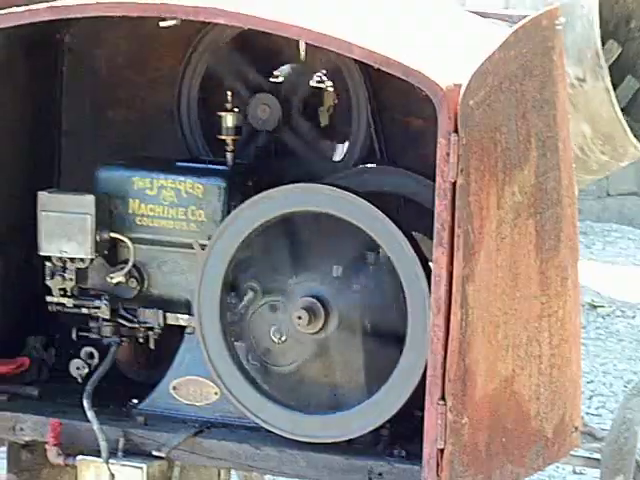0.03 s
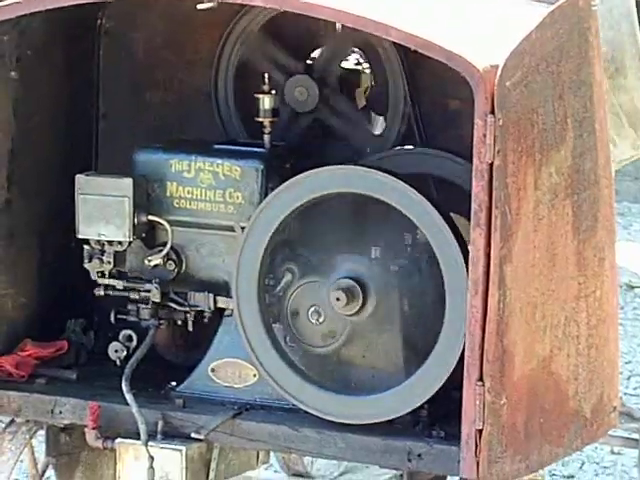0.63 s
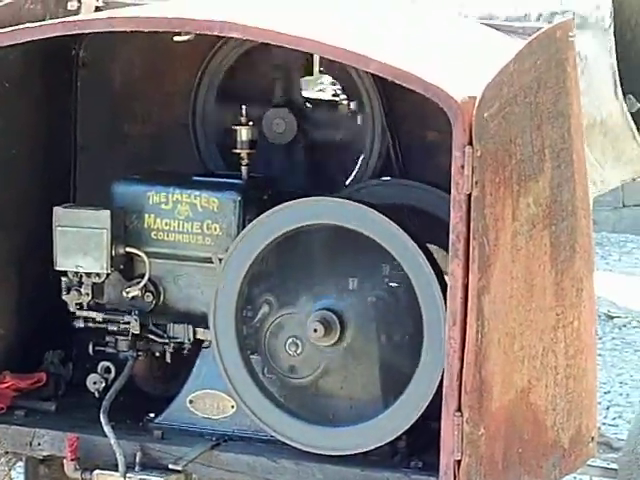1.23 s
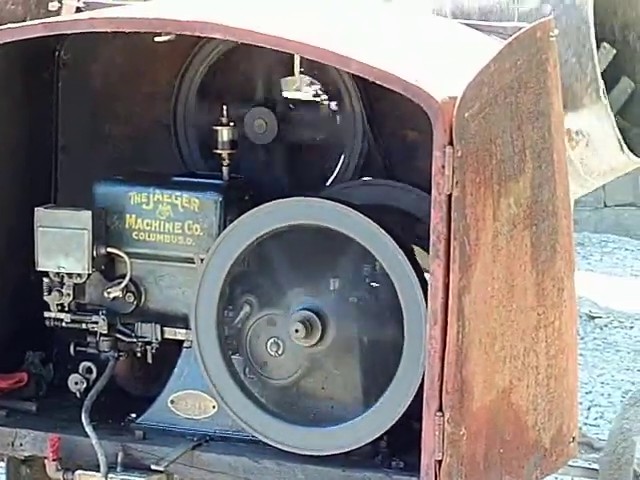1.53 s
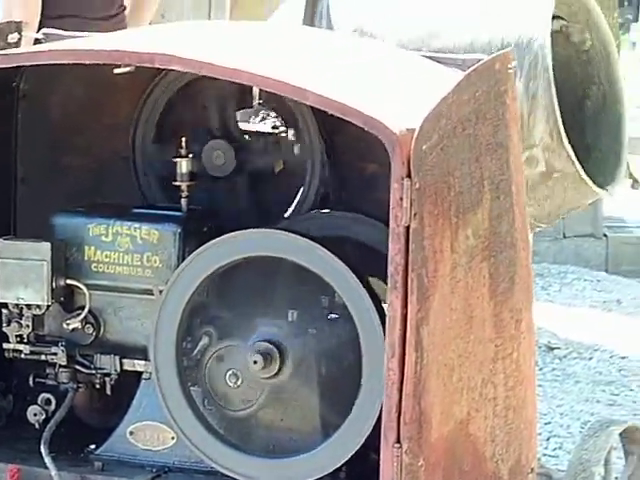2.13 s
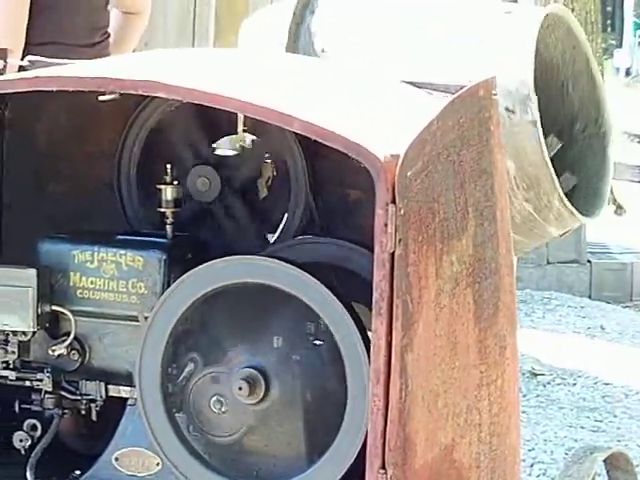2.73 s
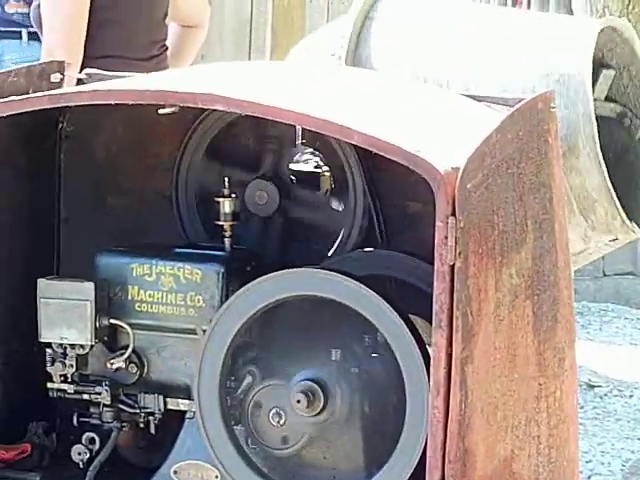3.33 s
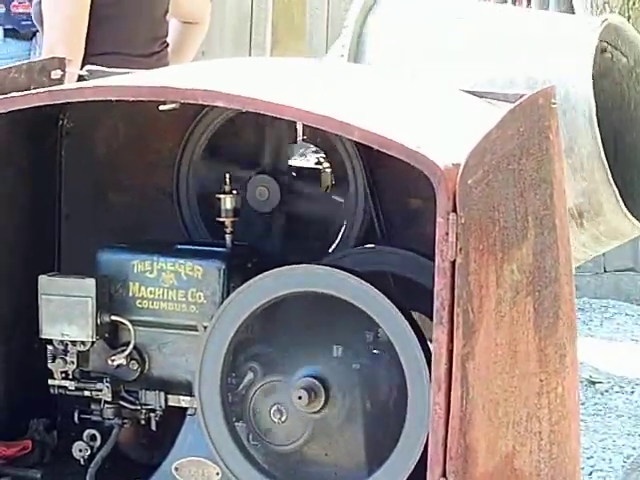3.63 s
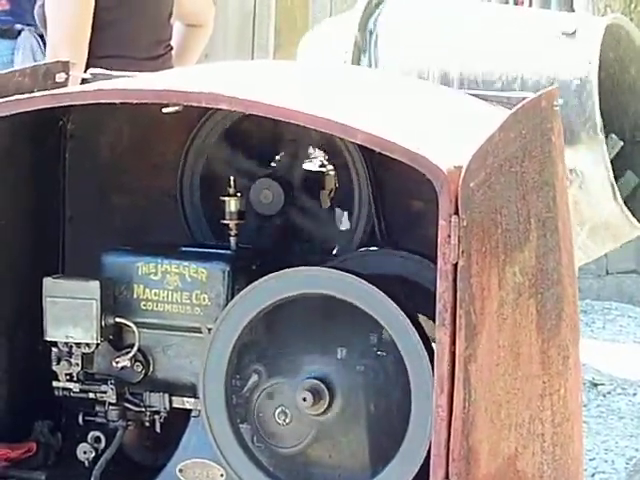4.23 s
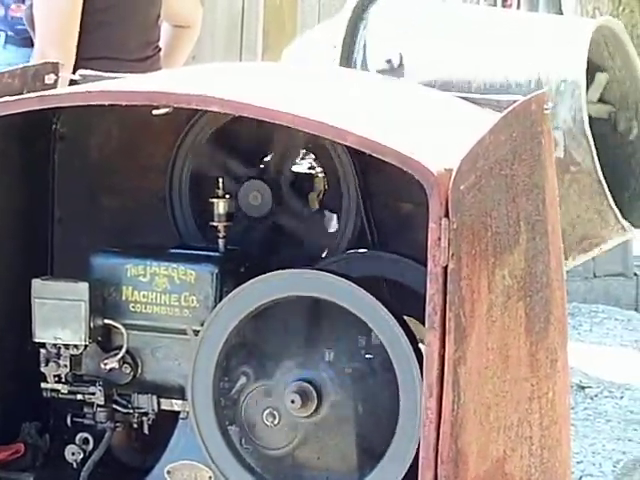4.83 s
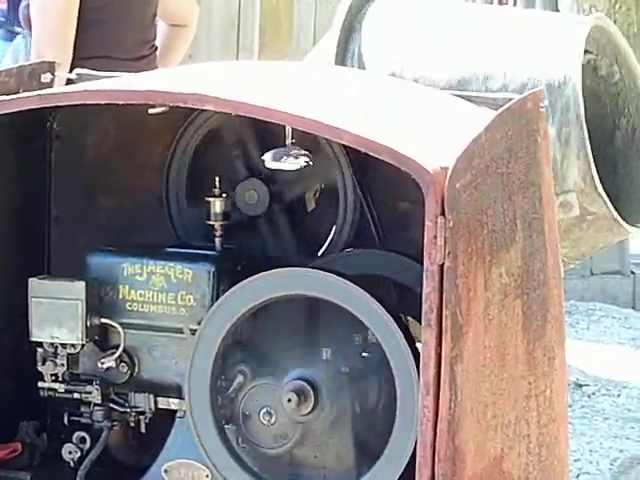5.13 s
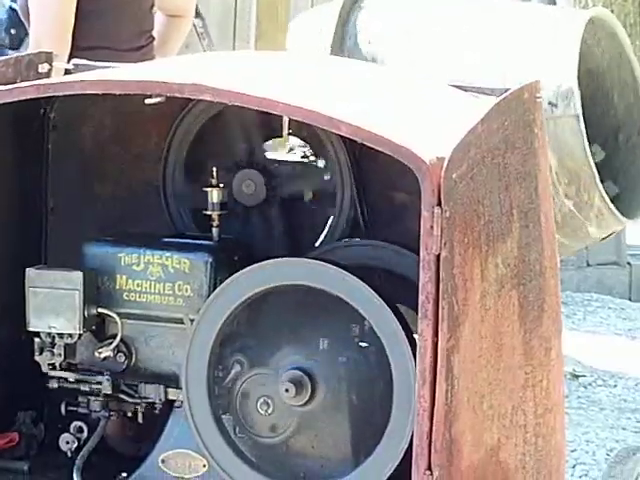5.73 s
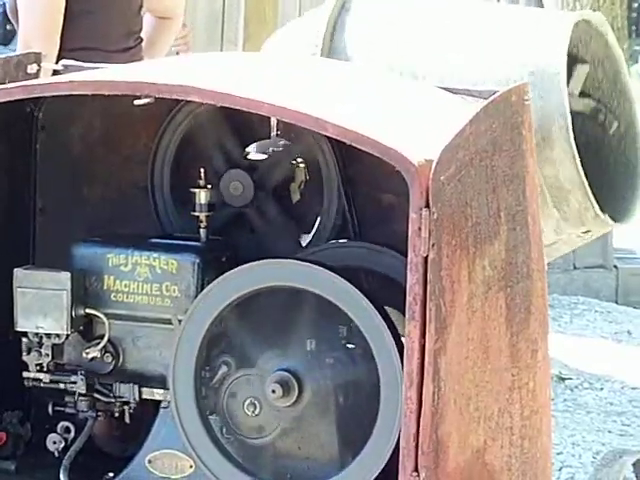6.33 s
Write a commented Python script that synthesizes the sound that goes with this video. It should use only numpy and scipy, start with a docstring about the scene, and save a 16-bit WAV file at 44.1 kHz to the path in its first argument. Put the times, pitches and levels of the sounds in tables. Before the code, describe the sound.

An old stationary engine runs outdoors inside the sheet-steel housing of a cement mixer. It fires six quickening pops, each with a hissing spit and a hollow clonk, then coasts for about four seconds before firing five more times. Throughout, gear teeth rattle in rhythmic surges, loose iron ticks and knocks, and the panels drone over a low rumble. A small mono microphone slightly rounds off the pops.

```python
"""A hit-and-miss engine pops inside the sheet-steel housing of a cement mixer, outdoors.
It fires six times, coasts for four seconds on its flywheels, then fires five times more.
Each pop is a push of gas that rings the exhaust pipe, with a hissing spit and a hollow clonk.
All along, gear teeth rattle, loose iron ticks and knocks, and the machine turning the drum
makes its panels drone and its frame rumble."""
import sys
import numpy as np
from scipy import signal
from scipy.io import wavfile

SR = 44100
rng = np.random.default_rng(int(sys.argv[2]) if len(sys.argv) > 2 else 0)


def master(y):
    """Save y as 16-bit WAV."""
    cut = np.clip(np.atleast_2d(y).T, -1, 1)
    pcm = np.round(cut * 32767)  # scale
    wavfile.write(sys.argv[1], SR, pcm.astype(np.int16))


N = 280917
TIME = np.arange(N) / SR
LIGHT_LOAD_DB = -33  # the gear level in LOAD that counts as easy running

# each firing: (time [s], gas push [dB], exhaust spit [dB], housing clonk [dB], extra grinding [dB])
FIRINGS = [(0.3089, -16.5, -17.5, -33, 8), (0.541, -18, -17.5, -29.5, 5), (0.7614, -20, -16.5, -33, 7.5),
           (0.9742, -19, -17.5, -29, 9), (1.1762, -20.5, -19, -28.5, 6.5), (1.371, -19, -17.5, -36.5, 5),
           (5.4562, -15.5, -16, -30, 6), (5.6827, -18.5, -18, -29.5, 5), (5.8958, -19.5, -17, -31, 7),
           (6.1012, -19.5, -17, -28, 5.5), (6.2814, -19, -17, -45, 7.5)]
# base levels, higher as the drum comes round: (time [s], gears [dB], housing drone [dB], rumble [dB])
LOAD = [(.2, -29.5, -40.5, -34), (.65, -31, -44, -38.5), (1.3, -30, -41.5, -38), (1.53, -35, -40, -38.5),
        (2.1, -30.5, -40, -36), (2.52, -27, -35, -33.5), (2.88, -33.5, -40.5, -39), (3.62, -34.5, -41, -38),
        (3.78, -29.5, -37.5, -35), (4.42, -25.5, -36, -31.5), (4.6, -27.5, -40, -36),
        (4.8, -29.5, -37, -35), (5.1, -25, -35, -31), (5.43, -26, -38.5, -31.5), (5.54, -32, -42, -40),
        (5.82, -33, -42, -37.5), (6.37, -30, -39.5, -37)]
# the broad tone of iron hitting iron: (frequency [Hz], level [dB])
IRON_TONE = [(300, -44), (900, -15), (1400, -14.5), (2500, -14.5), (3200, -8.5), (4500, -6.5), (5900, -8.5),
             (6550, -3), (7600, -1.5), (8300, -12)]
# the pitches at which the gears ring: (pitch [Hz], width [Hz], boost [dB])
GEAR_RINGS = [(2212, 30, 7.5), (2421, 62, 7.5), (2644, 37, 6.5), (5167, 54, 8.5), (6660, 140, 6),
              (8200, 120, 1)]


def amp(db):
    """Turns decibels into a factor to multiply by."""
    return 10 ** (np.asarray(db) / 20)


def evened(x):
    """Scales a signal to an average (rms) level of 1."""
    return x / np.sqrt(np.mean(x ** 2) + 1e-20)


def add(mix, s, sound):
    """Mixes a sound in, starting at s seconds."""
    part = mix[round(s * SR):][:len(sound)]
    part += sound[:len(part)]


def colour(x, tone, rings=(), size=8192):
    """Filters x to a broad tone (Hz, dB) with narrow ringing peaks (Hz, width in Hz, dB) on top."""
    hz = abs(np.fft.fftfreq(size, 1 / SR))
    points_hz, points_db = np.transpose(tone)
    db = np.interp(np.log(hz + 1), np.log(points_hz), points_db)
    for centre, width, boost in rings:
        db = db + boost / (1 + (2 * (hz - centre) / width) ** 2)
    spectrum = np.exp(np.conj(signal.hilbert(np.log(amp(db)))))  # rings after a blow, never before
    response = np.fft.ifft(spectrum).real
    return signal.oaconvolve(x, response[:size // 2])[:len(x)]


def noise(tone, rings=(), length=N):
    """Steady noise with the given tone, at level 1."""
    return evened(colour(rng.standard_normal(length), tone, rings))


def impacts(per_s, spread_db):
    """A random stream of tiny blows, a few harder than the rest."""
    strength = amp(spread_db * np.minimum(rng.exponential(1, N), 4))
    return evened(strength * rng.choice([-1, 1], N) * (rng.random(N) < per_s / SR))


def flutter(hz):
    """A smooth random wobble, mostly slower than hz."""
    return evened(signal.sosfilt(signal.butter(2, hz, fs=SR, output="sos"), rng.standard_normal(N)))


def fading_note(t, hz, db, fade_s):
    """One ring, slightly off pitch each time. A fade time is how long a sound takes to drop 60 dB."""
    return amp(db - 60 * t / fade_s) * np.sin(2 * np.pi * hz * (1 + 0.014 * rng.standard_normal()) * t)


def wall_echoes(x, fade_s, echo_db):
    """Adds the short, dense echoes between the steel walls."""
    t = TIME[:SR // 5]
    tail = rng.standard_normal(len(t)) * amp(-60 * t / fade_s) * (t > .001)
    return x + amp(echo_db) * signal.oaconvolve(x, tail / np.linalg.norm(tail))[:N]


def crank(firing_turns=2, coast_turns=38, drag_turns_per_s2=0.59):
    """Turns of the crank since the first firing, and when it coasts, slowed evenly by friction."""
    fired = np.array([row[0] for row in FIRINGS])
    gaps = np.diff(fired)
    coast = np.argmax(gaps)
    counts = np.cumsum(np.r_[0, np.where(gaps == gaps[coast], coast_turns, firing_turns)])
    times = np.r_[fired[0] - gaps[0], fired, fired[-1] + gaps[-1]]
    turns = np.interp(TIME, times, np.r_[-firing_turns, counts, counts[-1] + firing_turns])
    slowing = np.maximum((TIME - fired[coast]) * (fired[coast + 1] - TIME), 0)
    return turns + .5 * drag_turns_per_s2 * slowing, slowing > 0


def hump(turns, at_turn, width_turns):
    """A smooth bump of height 1 that comes round once a turn."""
    distance = (turns - at_turn + .5) % 1 - .5
    return np.exp(-.5 * (distance / width_turns) ** 2)


def piston_shakes(at_turn=.33, width_turns=.11, rise_db=4, between_db=-0.66):
    """Change of the drone in dB: the coasting piston shakes the housing at each end of its stroke."""
    turns, coasting = crank()
    ends = hump(turns, at_turn, width_turns) + hump(turns, at_turn + .5, width_turns)
    return coasting * (between_db + rise_db * ends)


def housing(drone_db=-4.5, rumble_db=-4, wobble_db=1.7):
    """The running machine shakes the panels of its housing and rocks the frame."""
    # broad tones of the panels and of the frame: (frequency [Hz], level [dB])
    panel_tone = [(120, -23), (260, -3.5), (400, 1), (500, -2), (700, 2.5), (850, 1.5), (1050, -4.5),
                  (1800, -25.5), (4000, -68)]
    frame_tone = [(8, -31.5), (25, 0.5), (50, -4), (80, -5), (115, -2.5), (170, -6), (240, -10), (400, -20),
                  (1500, -59)]
    # where the panels ring: (pitch [Hz], width [Hz], boost [dB])
    panel_rings = [(300, 7.7, 4.9), (356.6, 15, 9.2), (616.3, 31, 7.2), (694, 36, 2.9), (756, 43, 3.5),
                   (797, 34, 4.6)]
    # the housing's deepest boom: (time [s], level [dB])
    boom_levels = [(.2, -47.5), (2.2, -51), (3.05, -44.5), (3.4, -35), (3.6, -51), (4.0, -48), (4.6, -40.5),
                   (5.5, -40.5), (6.37, -52)]
    s, _, panel_db, frame_db = np.transpose(LOAD)
    drone = evened(colour(impacts(per_s=900, spread_db=1.0), panel_tone, panel_rings))
    drone *= amp(np.interp(TIME, s, panel_db) + piston_shakes() + drone_db + wobble_db * flutter(25))
    rumble = evened(colour(impacts(per_s=300, spread_db=2.5), frame_tone))
    rumble *= amp(np.interp(TIME, s, frame_db) + rumble_db)
    boom = noise([(15, -28), (40, -6), (53, 2), (66, -11.5), (130, -36.5), (1000, -82.5)])
    boom *= amp(np.interp(TIME, *np.transpose(boom_levels)))
    return drone + rumble + boom


def knocks(rise_s=0.0034):
    """Loose metal knocks: a short ring inside a burst of clatter around the same pitch."""
    # loose parts: (time [s], pitch [Hz], level [dB], fade [s], share of noise [0-1])
    blows = [(2.476, 2230, -24.5, 0.061, 0.8), (2.654, 1560, -21.5, 0.042, 0.5),
             (3.745, 334, -33.5, 0.16, 0.97), (3.797, 616, -26.5, 0.076, 0.94),
             (3.822, 140, -25, .05, 0.94), (4.022, 674, -28.5, 0.041, 0.87),
             (4.248, 632, -30.5, 0.076, 0.2), (4.399, 242, -24, 0.03, 0.64), (4.429, 95, -24.5, .09, 0.4),
             (4.456, 1652, -21.5, 0.046, 0.63), (4.585, 712, -28, 0.055, .4), (5.125, 367, -25.5, 0.065, 1),
             (5.272, 305, -22, 0.087, 0.25), (5.287, 73.5, -22, 0.074, 0.75)]
    latch_clinks = [(s, 2260, -30, .01, .5) for s, *_ in FIRINGS]
    t, out = TIME[:SR // 5], np.zeros(N)
    for s, hz, db, fade_s, noisy in blows + latch_clinks:
        clatter = noise([(hz / 2, -7), (hz, 0), (hz * 2, -14), (hz * 10, -60)], length=len(t))
        ring = np.sin(2 * np.pi * hz * t)
        body = np.sqrt(noisy) * clatter + np.sqrt(2 * (1 - noisy)) * ring
        add(out, s, amp(db - 60 * t / fade_s) * np.minimum(t / rise_s, 1) * body)
    return wall_echoes(out, fade_s=0.28, echo_db=-3.5)


def ticks(rise_s=0.00043, igniter_lead_s=0.012):
    """An opening click, then quick buzzes of iron on iron; the igniter trips just before each firing."""
    # a short click as the sound starts, then the loudest ticks of the linkage:
    # (time [s], level [dB], fade [s])
    clicks = [(.197, -28, 0.018), (0.248, -13.5, 0.011), (.273, -22, 0.017), (0.426, -22.5, 0.037),
              (1.776, -23, 0.031), (1.977, -18.5, 0.028), (2.163, -22, .04), (3.828, -17, .035),
              (3.9012, -20, 0.028), (4.2945, -20.5, 0.028), (4.4126, -18.5, 0.062), (4.457, -20, 0.088),
              (4.765, -19.5, .025), (5.441, -23, 0.049)]
    igniter = [(s - igniter_lead_s, -30, .045) for s, *_ in FIRINGS]
    t, level = TIME[:SR // 10], np.zeros(N)
    for s, db, fade_s in clicks + igniter:
        add(level, s, amp(db - 60 * t / fade_s) * np.minimum(t / rise_s, 1))
    return level * noise(IRON_TONE, GEAR_RINGS)


def cam_scrape(at_turn=0.29, width_turns=0.093):
    """Swells from 0 to 1 on every second coasting turn, as the cam scrapes past its follower."""
    turns, coasting = crank()
    return coasting * hump(turns / 2, at_turn / 2, width_turns / 2)


def gear_surges(load_db, at_turn=0.21, width_turns=.16, height=7):
    """Change of the gear clatter in dB: it swells twice a turn, as the piston reverses."""
    turns, coasting = crank()
    cam = 1.3 * np.cos(np.pi * (turns - at_turn))  # the half-speed cam lifts every second turn
    strong = hump(turns, at_turn, width_turns) * (height + cam)
    weak = hump(turns, at_turn + 0.61, width_turns / 2) * height * .45
    # a heavy load keeps the teeth in contact and evens out the clatter
    looseness = np.exp(-0.22 * np.maximum(load_db - LIGHT_LOAD_DB, 0))
    return (strong + weak) * looseness * np.where(coasting, 1, 0.33) - 1


def gear_taps(effort, detune=.003):
    """Slack parts now and then strike one gear, which rings on at its own pitch."""
    t, out = TIME[:SR // 8], np.zeros(N)
    for hz, width, boost_db in GEAR_RINGS:
        pitch = hz * (1 + detune * rng.standard_normal())
        ring = np.exp(-np.pi * width * t) * np.sin(2 * np.pi * pitch * t)
        blows = effort * impacts(per_s=22, spread_db=3)
        out += amp(0.79 * boost_db) * signal.oaconvolve(blows, ring / np.linalg.norm(ring))[:N]
    return out / len(GEAR_RINGS)


def gears(rattle_db=-4, clicks_db=-8, grind_db=-13, taps_db=-13, squeeze_lead_s=0.044, squeeze_s=0.019):
    """Teeth chatter under load and grind harder as the piston squeezes the fuel before each firing."""
    # the broad tone of grinding teeth: (frequency [Hz], level [dB])
    grind_tone = [(300, -30), (900, -10), (1400, -6), (2000, -0.5), (2500, -3.5), (3200, -3), (4000, -10),
                  (6000, -32)]
    s, gear_db, _, _ = np.transpose(LOAD)
    load_db = np.interp(TIME, s, gear_db)
    effort = amp(load_db + gear_surges(load_db) + 1.77 * flutter(70))
    teeth = impacts(per_s=2500, spread_db=0.5) + 0.44 * rng.standard_normal(N)
    rattle = evened(colour(teeth, IRON_TONE, GEAR_RINGS)) * amp(rattle_db + 0.6 * flutter(150))
    # harder single hits ring only the highest pitches
    click_tone = [(3000, -29.5), (5800, -12.5), (6600, -2), (7700, -3), (8500, -5.5)]
    clicks = evened(colour(impacts(per_s=150, spread_db=2.5), click_tone)) * amp(clicks_db)
    squeeze_db = sum(rise_db * np.exp(-.5 * ((TIME - at + squeeze_lead_s) / squeeze_s) ** 2)
                     for at, *_, rise_db in FIRINGS)
    grind = evened(colour(impacts(per_s=4500, spread_db=2), grind_tone, GEAR_RINGS))
    grind *= amp(grind_db + squeeze_db + 2.5 * cam_scrape() + 0.19 * (load_db - LIGHT_LOAD_DB))
    return (rattle + clicks + grind) * effort + amp(taps_db) * gear_taps(effort)


def exhaust_spit(peak_s=0.0076, tail_db=-13, tail_fade_s=0.36, rough_db=2.0, bark_s=0.0037, bark_db=-10):
    """Gas tears through the valve: a low bark at once, then a ragged hiss that swells and dies."""
    # the broad tone of the rushing gas: (frequency [Hz], level [dB])
    hiss_tone = [(100, -15.5), (400, -18.5), (800, -11.5), (1200, -9), (2200, -6.5), (3200, -6.5),
                 (4700, -4), (5900, -3.5), (6700, 1), (7400, 0.5), (8300, -8)]
    # where the exhaust outlet rings: (pitch [Hz], width [Hz], boost [dB])
    outlet_rings = [(760, 90, 5), (2080, 120, 3), (2650, 90, 4), (3010, 90, 3), (4620, 150, 3),
                    (5750, 90, 4), (7340, 160, 4)]
    bark_tone = [(150, -12.5), (500, 2), (800, -0.5), (1100, -5), (2000, -1.5), (3200, -16),
                 (6000, -18.5)]
    t, hiss_level, bark_level = TIME[:SR // 4], np.zeros(N), np.zeros(N)
    jet = (t / peak_s * np.exp(1 - t / peak_s)) ** 1.23
    tail = amp(tail_db - 60 * t / tail_fade_s) * np.minimum(t / peak_s, 1)
    for s, push_db, spit_db, _, _ in FIRINGS:
        add(hiss_level, s, amp(spit_db) * np.hypot(jet, tail))
        add(bark_level, s, amp(push_db + bark_db) * t / bark_s * np.exp(1 - t / bark_s))
    ragged = amp(rough_db * np.tanh(flutter(600)))
    hiss = hiss_level * evened(colour(rng.standard_normal(N), hiss_tone, outlet_rings) * ragged)
    bark = bark_level * noise(bark_tone, outlet_rings)
    return hiss + wall_echoes(bark, fade_s=.18, echo_db=-2.0)


def engine_pops(peak_s=0.0007, width_s=0.00085, clonk_rise_s=0.0021, stroke_turns=.45):
    """The exhaust valve opens and a push of gas rings the pipe; the housing clonks as the stroke ends."""
    # gas swinging back and forth after the push: (delay [s], half width [s], share of the push [ratio])
    backwash = [(.0055, .003, -.2), (.0117, 0.0016, 0.31), (.0152, .0017, .42), (.0275, .002, -.15),
                (.034, .016, -.11)]
    # the ring of the exhaust pipe: (delay [s], pitch [Hz], level [dB], fade [s])
    pipe_notes = [(0, 734.6, -1, 0.016), (.004, 850, -16, .09), (.004, 880, -28.5, 0.078),
                  (.005, 280, -34.5, 0.03)]
    # the hollow clonk of the housing: (pitch [Hz], level [dB], fade [s])
    clonk_notes = [(151, -10, 0.081), (297, -3, 0.064), (354, -2, 0.14), (407, -5.5, 0.035),
                   (616, -7, 0.039)]
    t, out = TIME[:SR // 3], np.zeros(N)
    turns, _ = crank()
    for s, push_db, _, clonk_db, _ in FIRINGS:
        pop = np.exp(-((t - peak_s) / width_s) ** 2)
        for delay, half_width, share in backwash:
            pop += share * np.exp(-((t - delay) / half_width) ** 2)
        for delay, hz, db, fade_s in pipe_notes:
            add(pop, delay, fading_note(t, hz, db, fade_s))
        add(out, s, amp(push_db) * pop)
        clonk = sum(fading_note(t, *row) for row in clonk_notes) * np.minimum(t / clonk_rise_s, 1)
        stroke_end_s = np.interp(turns[round(s * SR)] + stroke_turns, turns, TIME)
        add(out, stroke_end_s, amp(clonk_db) * clonk)
    return out


def scene():
    """All the sources together, the same in both channels."""
    return np.tile(gears() + housing() + engine_pops() + exhaust_spit() + ticks() + knocks(), (2, 1))


def record(dry, start_s=.1955, ceiling=0.51, top_hz=9100):
    """A small mono microphone, on from start_s: it rounds off the pops and loses the highest treble."""
    # the microphone's tone, with a deep dip near 4200 Hz: (frequency [Hz], level [dB])
    microphone_tone = [(3200, 0.5), (3800, -10.5), (4070, -18), (4190, -36.5), (4320, -14), (4600, -9.5),
                       (5500, -1.5), (6200, 2), (8100, 6.5), (8500, -2), (8800, -13), (9050, -31.5)]
    sound = dry.mean(0) * (TIME >= start_s)
    sound = sound / np.sqrt(np.hypot(1, (sound / ceiling) ** 2))  # soft overload
    low_pass = signal.firwin(511, top_hz, window=("kaiser", 9), fs=SR)
    return np.tile(signal.oaconvolve(colour(sound, microphone_tone), low_pass, "same"), (2, 1))


dry = scene()
out = record(dry)
master(out)
```